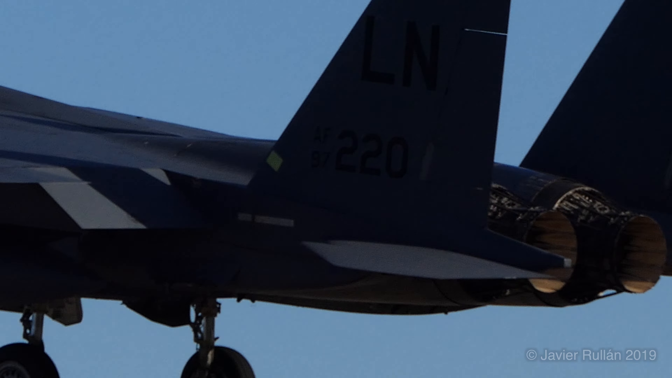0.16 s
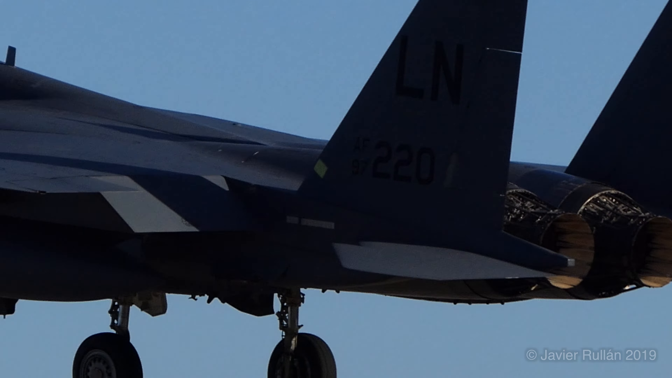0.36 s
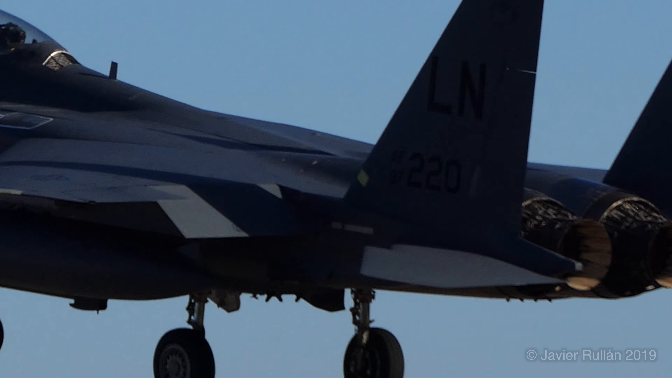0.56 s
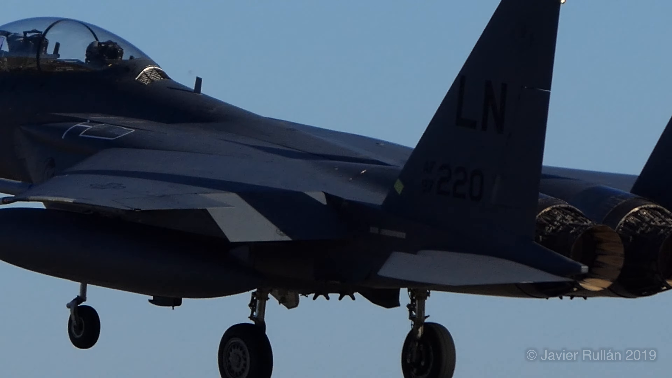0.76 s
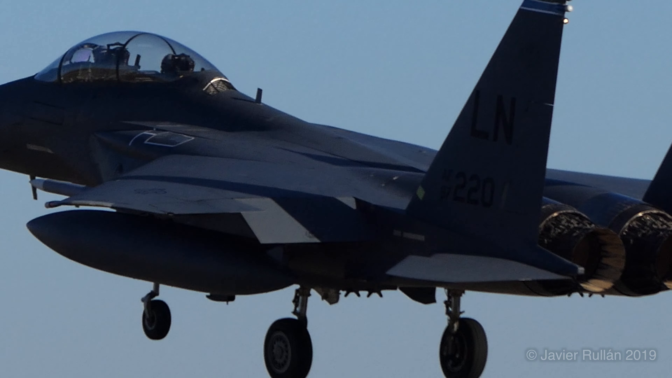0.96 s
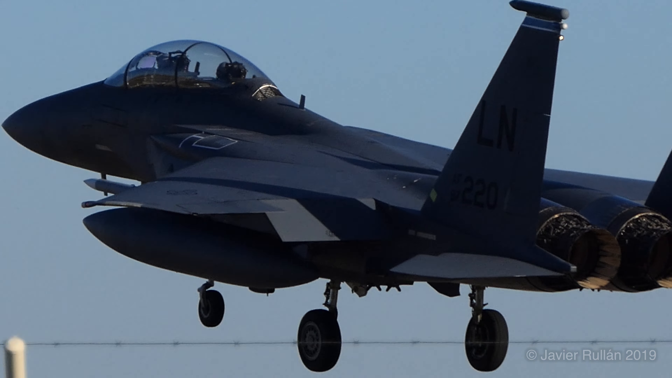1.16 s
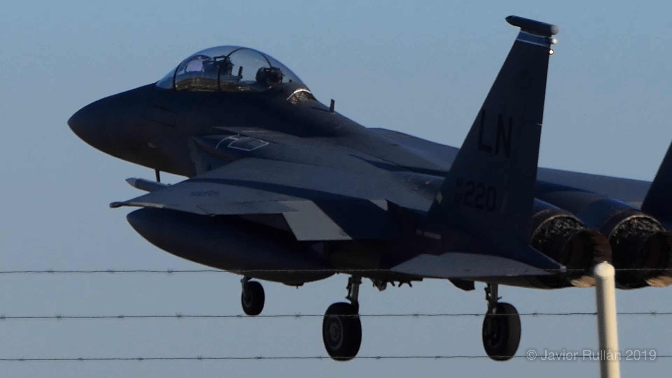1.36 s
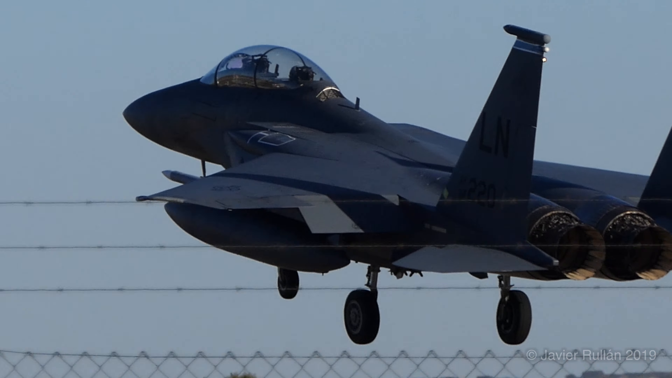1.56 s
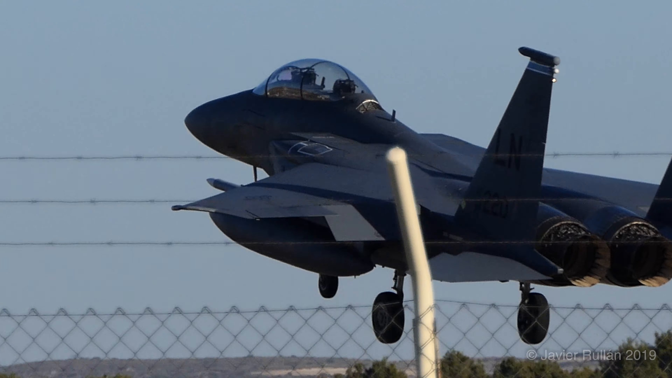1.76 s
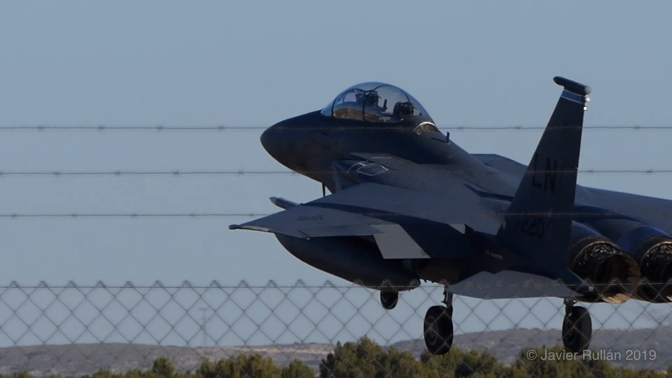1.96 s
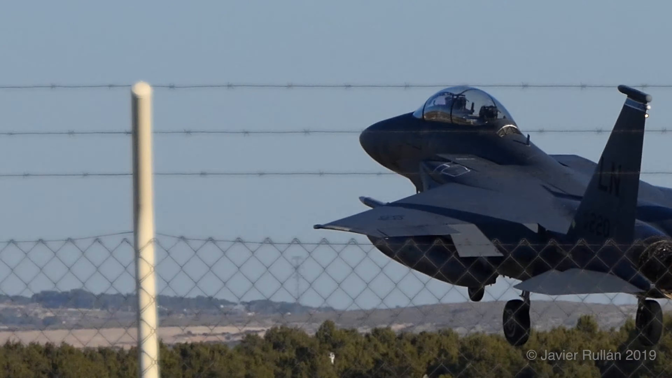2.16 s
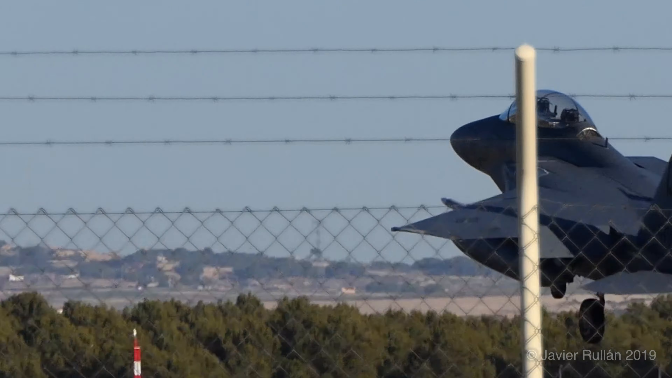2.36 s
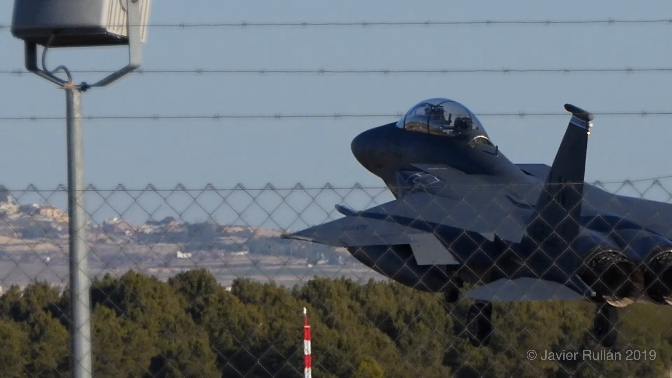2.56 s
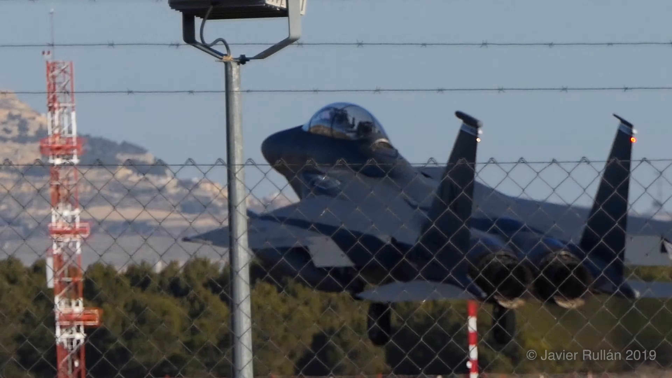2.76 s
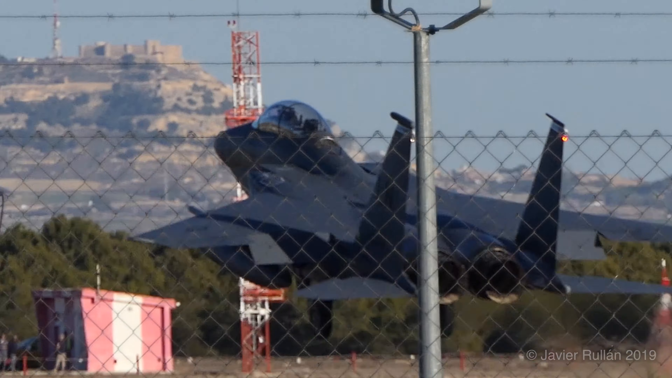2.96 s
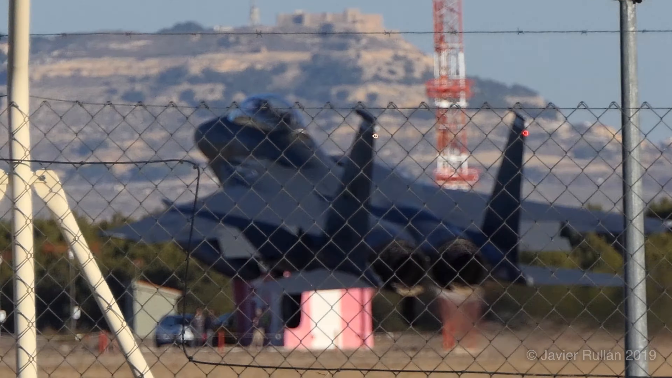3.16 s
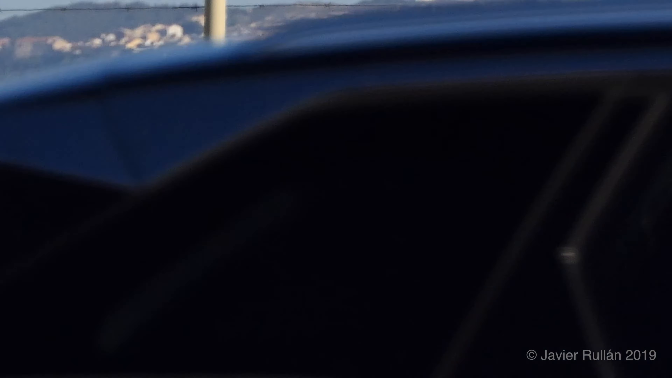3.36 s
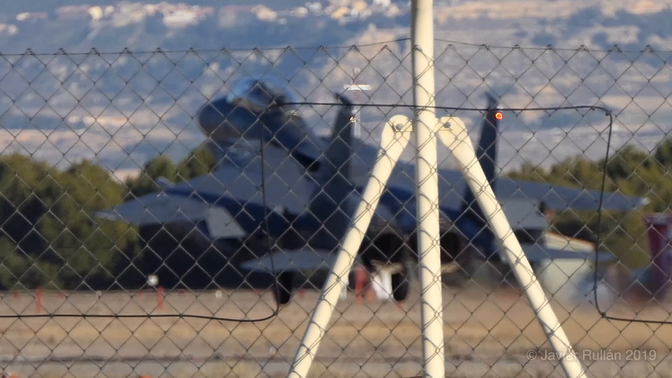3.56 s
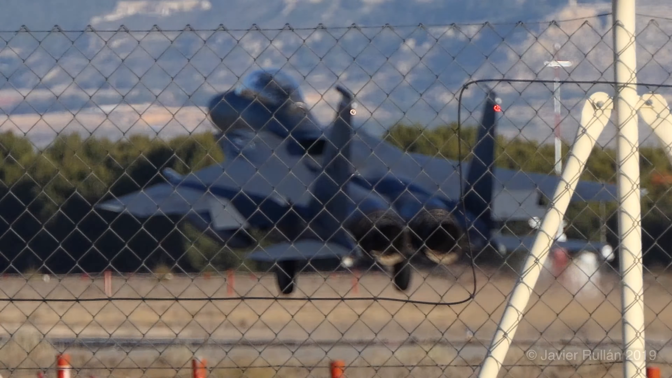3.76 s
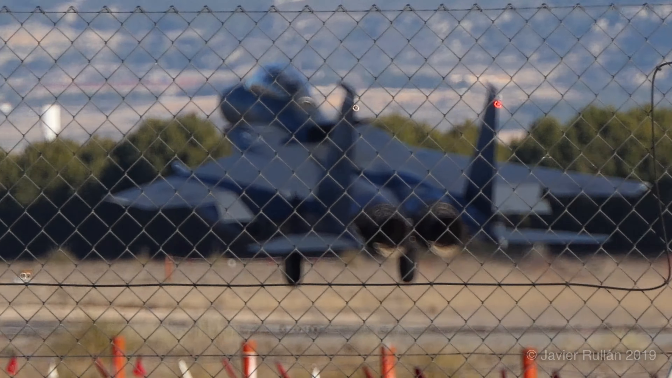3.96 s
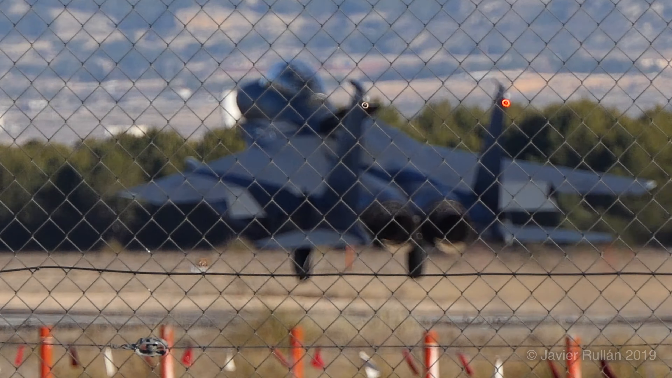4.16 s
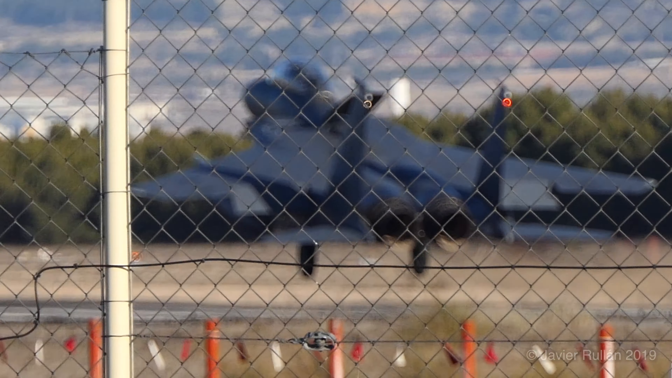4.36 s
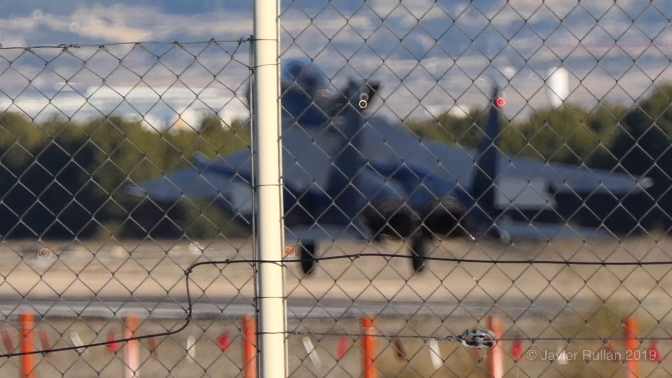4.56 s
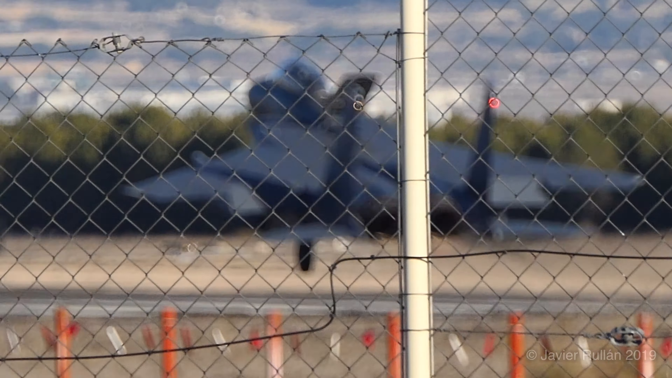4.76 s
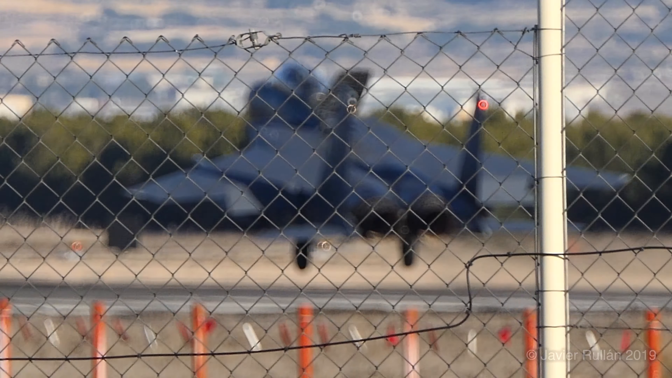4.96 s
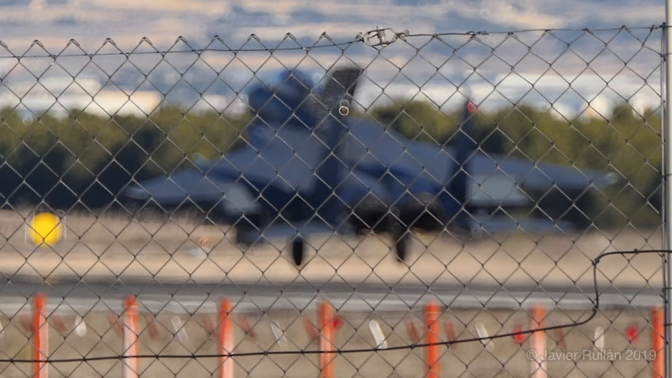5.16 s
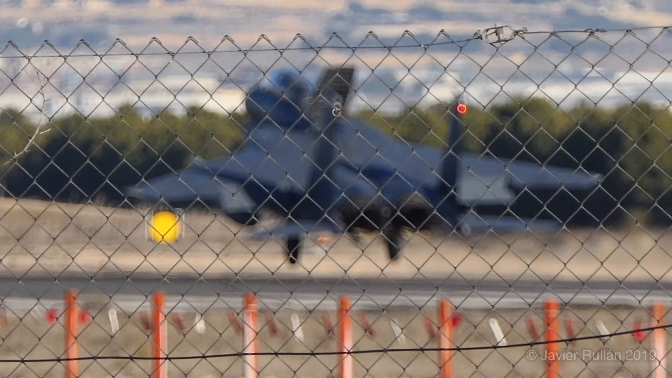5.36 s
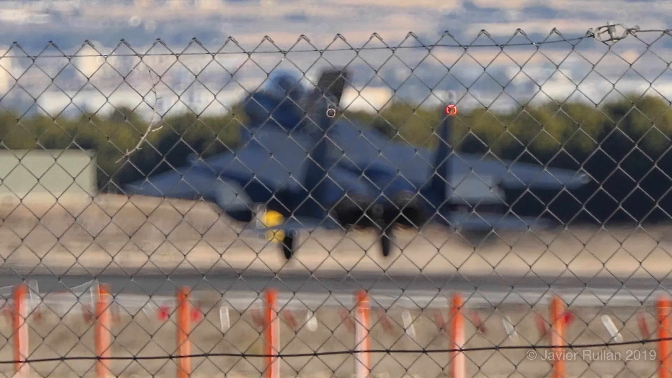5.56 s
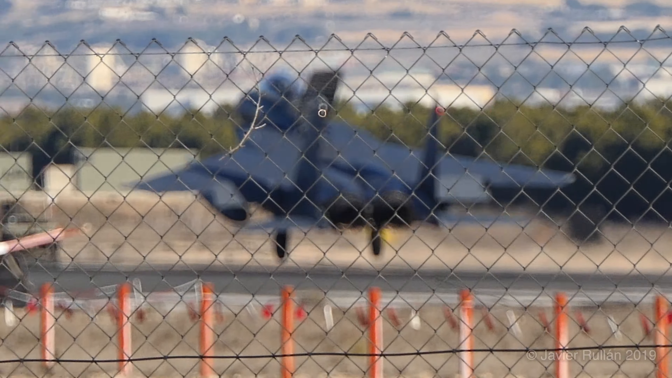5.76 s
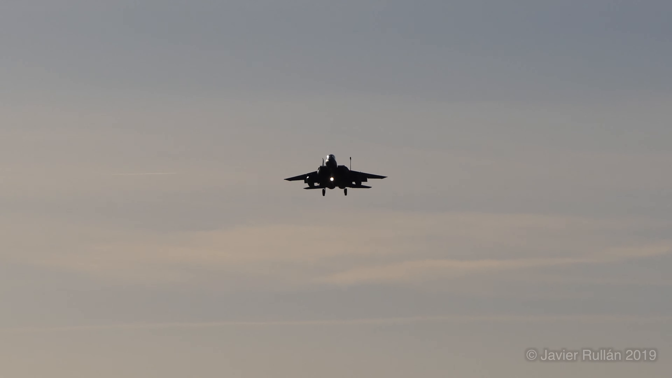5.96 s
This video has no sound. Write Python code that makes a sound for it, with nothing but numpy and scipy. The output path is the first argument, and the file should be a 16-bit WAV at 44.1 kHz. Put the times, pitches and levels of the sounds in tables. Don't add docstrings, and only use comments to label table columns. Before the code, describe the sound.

Loud turbulent jet exhaust fades into the distance, a road vehicle nears with tyre rush, climbing hum and metallic rattles, then an abrupt far, muffled roar.

```python
import sys
import numpy as np
from scipy import signal
from scipy.io import wavfile
from scipy.ndimage import uniform_filter1d

SR = 44100
rng = np.random.default_rng(int(sys.argv[2]) if len(sys.argv) > 2 else 0)


def store_wav(level_fs):
    pcm = np.round(np.clip(np.atleast_2d(level_fs), -1, 1) * 32767)
    wavfile.write(sys.argv[1], SR, pcm.T.astype(np.int16))


def ratio(d):
    e = np.asarray(d, float) / 20
    return 10 ** e


N = 265041
T = np.arange(N) / SR
HZ = np.fft.rfftfreq(1024, 1 / SR)
FRAME_S = np.arange(N // 256 + 5) * 256 / SR


def evened(x):
    return x / np.sqrt(np.mean(x ** 2) + 1e-20)


def read(points, hz):
    f, value = np.transpose(points)
    return np.interp(np.log(hz + 1), np.log(f + 1), value)


def curve(rows, t):
    s, value = np.transpose(rows)
    return np.interp(t, s, value)


def since(s, t):
    return np.maximum(t - s, 0)


def swells(rows, t):
    return sum(db * np.exp(-((t - s) / length_s) ** 2 / 2) for s, db, length_s in rows)


def drift(bins, frames):
    z = rng.standard_normal((len(FRAME_S), len(HZ))).T
    z = uniform_filter1d(z, size=bins, axis=0)
    return evened(uniform_filter1d(z, size=frames, axis=1))


def noise(field_db):
    a, b = rng.standard_normal((len(FRAME_S), len(HZ), 2)).T
    gains = np.array([ratio(0 * field_db), ratio(field_db)])
    flat, shaped = signal.istft((a + 1j * b) * gains, nperseg=1024, noverlap=768)[1]
    return shaped[:N] * np.sqrt(len(HZ)) / flat.std()


def steady(colour, patchy_db):
    return noise(read(colour, HZ)[:, None] + patchy_db * drift(bins=6, frames=5))


# f/Hz, level/dB per bin
FIELD_COLOUR = [(300, -107.5), (2000, -73.5), (4000, -84), (7000, -97), (9000, -101.5), (12500, -101.0),
                (15000, -103.5)]


def airfield():
    return steady(FIELD_COLOUR, 0.3)


# f/Hz, level/dB per bin
FAR_COLOUR = [(30, -80.5), (130, -66), (220, -65), (270, -57.5), (510, -47.5), (700, -56), (1000, -63),
              (1200, -70), (1450, -79), (2900, -100), (9000, -101), (15000, -103)]


def far_jet():
    return steady(FAR_COLOUR, 0.95)


# f/Hz, level/dB
RUSH_COLOUR = [(30, 3), (60, 3), (120, 8), (250, 11.5), (450, 8.5), (700, 2), (1100, -2), (1500, 1),
               (2200, 0.5), (2900, -5.5), (4000, -6), (5500, -13), (7500, -24.5), (12000, -38)]
# t/s, level/dB, length/s
RUSH_LULLS = [
    (1.85, -6, 0.11),
    (4.0, 1, 0.12),
    (4.7, -7, 0.11),
    (5.2, -1, 0.092),
]


def tyres():
    start_s, nearing_s, turn_in_s = 1.7, 2.84, 0.41
    far_db, turn_in_db, nearing_db_per_s = -77.5, 5.5, 1.81
    near_s = since(nearing_s, FRAME_S)
    level_db = far_db + turn_in_db * np.minimum(near_s / turn_in_s, 1)
    level_db = level_db + nearing_db_per_s * near_s + swells(RUSH_LULLS, FRAME_S)
    on = np.minimum(since(start_s, FRAME_S) / 0.11, 1)
    field_db = read(RUSH_COLOUR, HZ)[:, None] + level_db + 20 * np.log10(on + 1e-4)
    tremble_db = read([(500, 0.1), (2500, 2.0)], HZ)[:, None] * drift(bins=100, frames=5)
    return noise(field_db + tremble_db)


def hum(speed, orders, beats, wobble, shimmer_db):
    start_s = speed[0][0]
    hz = curve(speed, T)
    on = np.clip((T - start_s) / 0.15, 0, 1)
    levels_db = []
    for (db, db_per_s), rows in zip(orders, beats):
        levels_db.append(db + db_per_s * since(start_s, T) + swells(rows, T))
    slow = [evened(uniform_filter1d(rng.standard_normal(N), size=3000)) for _ in range(3)]
    turn = 2 * np.pi * np.cumsum(hz * (1 + wobble * slow[0])) / SR
    first = ratio(levels_db[0] + shimmer_db * slow[1])
    second = ratio(levels_db[1] + shimmer_db * slow[2])
    return np.sqrt(2) * on * (first * np.sin(turn) + second * np.sin(2 * turn + 1))


# t/s, f/Hz
GEAR = [(3.0, 210.0), (3.5, 216.4), (4.2, 223.7), (5.0, 231.4), (5.88, 244.2)]
# start level/dB, climb/(dB/s)
GEAR_ORDERS = [(-49, -3), (-64.5, 6.5)]
# t/s, level/dB, length/s
GEAR_FIRST_BEATS = [(3.36, -7, 0.057), (3.5, 3, 0.073), (4.15, 3.5, 0.17), (4.68, -6, 0.066),
                    (5.4, -3, 0.22)]
GEAR_SECOND_BEATS = [(3.5, -1, 0.22), (4.3, 7, 0.25), (4.63, -2, 0.071), (4.82, -10, 0.044),
                     (5.55, 5, 0.13), (5.8, -5, 0.077)]


def gear():
    return hum(GEAR, GEAR_ORDERS, [GEAR_FIRST_BEATS, GEAR_SECOND_BEATS], wobble=0.00058, shimmer_db=0.6)


# t/s, f/Hz
ENGINE = [(3.3, 73.1), (3.9, 78.1), (4.2, 80.4), (4.65, 84.54), (5.4, 89.2), (5.7, 93.6), (5.88, 95.4)]
# start level/dB, climb/(dB/s)
ENGINE_ORDERS = [(-62, 3), (-51.5, 4.45)]
# t/s, level/dB, length/s
ENGINE_FIRST_BEATS = [(3.65, 0, .15), (4.95, -3, 0.069), (5.62, 9.5, 0.16)]
ENGINE_SECOND_BEATS = [(3.45, -7.5, .2), (3.78, -10, .035), (4.68, -12.5, .055), (5.15, 1.5, .15),
                       (5.45, -19, 0.078), (5.9, -7, .08)]


def engine():
    beats = [ENGINE_FIRST_BEATS, ENGINE_SECOND_BEATS]
    return hum(ENGINE, ENGINE_ORDERS, beats, wobble=0.0024, shimmer_db=0.25)


# centre t/s, level/dB, ring f/Hz
RATTLES = [(3.199, -64, 3670), (3.32, -61, 3900), (3.362, -54, 3830), (3.452, -56, 3700), (3.49, -60, 3700),
           (3.684, -57, 4610), (3.832, -58, 3570), (3.96, -52, 3930), (4.084, -56, 3910),
           (4.125, -59, 3920), (4.217, -55, 3910), (4.252, -63, 3495), (4.462, -54.5, 3666),
           (4.49, -55, 4840), (4.553, -53.5, 3500), (4.814, -46.5, 3700), (4.853, -55, 4560),
           (4.911, -53, 3620), (4.974, -54, 3540), (5.05, -58.5, 4840), (5.176, -59.5, 3620),
           (5.287, -52, 3550), (5.323, -52, 3590), (5.402, -55, 4280), (5.529, -58.5, 3670),
           (5.676, -57.5, 3870), (5.758, -54, 4476), (5.822, -57, 3474), (5.865, -51.5, 3500)]


def rattles():
    width_hz, boost_db, length_s = 900, -1.5, 0.0089
    out = np.zeros(N + SR)
    t = np.arange(-2000, 2000) / SR
    shape = (len(RATTLES), len(t))
    chatter = rng.standard_normal(shape) * np.sqrt(rng.exponential(1, shape))
    r = np.exp(-np.pi * width_hz / SR)
    swell = np.exp(-(t / length_s) ** 2 / 2)
    for (s, db, hz), clicks in zip(RATTLES, chatter):
        turn = np.exp(2j * np.pi * hz * t)
        ring = (turn * signal.lfilter([1], [1, -2 * r, r * r], clicks / turn)).real
        start = round((s + t[0]) * SR)
        out[start:start + len(t)] += ratio(db + boost_db) * evened(ring) * swell
    return out[:N]


# t/s, level/dB per bin
JET = [(0.0, -24.5), (0.12, -28), (0.22, -26.5), (0.4, -29.5), (0.72, -29.5), (0.88, -33), (1.1, -34),
       (1.55, -37.5), (1.9, -43.5), (2.18, -43.5), (2.32, -47), (2.6, -49.5), (3.2, -50), (3.55, -48.5),
       (4.2, -51.5), (4.7, -53.5), (5.3, -58.5), (5.75, -54)]
# f/Hz, level/dB
JET_COLOUR = [(30, -51), (70, -20), (150, -5.5), (300, -7.5), (450, -1.5), (750, -3.5), (1100, -8),
              (3500, -26.5), (5000, -38.5), (6900, -47), (8400, -60), (10200, -58), (13200, -68),
              (14400, -88)]
# f/Hz, level/dB
GRAZING_COLOUR = [(30, -31.5), (70, -18), (150, -2), (230, -7), (330, -8), (480, -8.5), (650, 0.0),
                  (900, -4.5), (1200, -9.5), (1500, -19.5), (2500, -23), (4000, -47.5), (7000, -74),
                  (14000, -108.5)]
# t/s, share/1
GRAZING = [(0, 0), (1.3, .15), (2.5, 1)]
# t/s, level/dB
AFT = [(0, -15.5), (.35, -11.5), (.55, 0.5), (.85, 0), (1.1, 7.5), (1.6, 5.5), (1.85, 2), (2.1, 4),
       (2.4, 0.5)]
# t/s, level/dB, length/s
GUSTS = [(0.0, -3, 0.052), (.17, 0.5, 0.024), (.41, 3.5, .03), (.53, 1, 0.024), (.7, 5, .07),
         (.88, -0.5, 0.038), (1.0, 0.5, 0.035), (1.13, 2, .03), (1.25, -3, 0.14), (1.56, 2.5, 0.081),
         (1.82, -5, 0.058), (2.05, 4, 0.06)]
# t/s, level/dB, length/s
RUMBLE_SWELLS = [
    (0.0, -5, 0.033),
    (.93, 4.5, 0.057),
    (1.11, 3.5, 0.034),
    (1.3, 5, 0.023),
    (2.0, 1, 0.047),
    (3.75, -5, 0.24),
    (5.55, -6, .1),
]
# t/s, f/Hz, lift level/dB, length/s
ECHO_PEAKS = [(.15, 960, 2, 0.076), (.38, 440, 8, 0.093), (.6, 675, 3, 0.17), (1.0, 406, 6, 0.068),
              (1.327, 452, 6, 0.067), (1.597, 1090, 4, 0.079), (2.173, 805, 6, 0.076),
              (2.397, 1260, 4, 0.047), (2.75, 583, 2, 0.36), (3.65, 794, 3.5, 0.25)]


def jet():
    far, gust_db = curve(GRAZING, FRAME_S), swells(GUSTS, FRAME_S)

    rumble_db = -0.9 - 0.5 * gust_db + 4 * since(4.75, FRAME_S) + swells(RUMBLE_SWELLS, FRAME_S)

    bright_far_db, dull_from_s, dull_db_per_s = 2, 2.9, 8.5
    bright_db = gust_db + bright_far_db * far - dull_db_per_s * since(dull_from_s, FRAME_S)

    fizz_near_db, fizz_loss_db, fizz_goes_s, fizz_fall_s = 4, 4.5, 0.71, 0.59
    fizz_gone = np.minimum(since(fizz_goes_s, FRAME_S) / fizz_fall_s, 1)
    fizz_db = 1.12 * gust_db + fizz_near_db - fizz_loss_db * fizz_gone

    field_db = np.outer(read(JET_COLOUR, HZ), 1 - far) + np.outer(read(GRAZING_COLOUR, HZ), far)
    field_db += curve(JET, FRAME_S)
    field_db += np.outer(read([(250, 1), (500, 0)], HZ), rumble_db)
    field_db += np.outer(read([(1000, 0), (1700, 1), (3000, 1), (6000, 0)], HZ), bright_db)
    field_db += np.outer(read([(3000, 0), (6000, 1)], HZ), fizz_db)
    field_db += np.outer(read([(90, 0.98), (190, 0.017)], HZ), curve(AFT, FRAME_S))
    for s, peak_hz, lift_db, length_s in ECHO_PEAKS:
        band = np.exp(-(np.log((HZ + 1) / peak_hz) / 0.11) ** 2 / 2)
        field_db += np.outer(band, swells([(s, lift_db, length_s)], FRAME_S))

    flutter_db = read([(300, 0.061), (1500, 0.59), (5000, 0.74), (9000, 2.4)], HZ)[:, None]
    flutter_db = flutter_db * drift(bins=200, frames=8)
    return noise(field_db + 1.27 * drift(bins=8, frames=14) + flutter_db)


def scene():
    vehicle = tyres() + gear() + engine() + rattles()
    runway = airfield() + vehicle + jet()
    change_s, fade_s = 5.885, 0.0015
    after = np.clip((T - change_s) / fade_s, 0, 1)
    return ((1 - after) * runway + after * far_jet())[None]


def low_pass(x):
    return signal.sosfilt(signal.butter(12, 15630, fs=SR, output="sos"), x)


def record(dry):
    thin = signal.sosfilt(signal.butter(2, 38, "high", fs=SR, output="sos"), dry)
    edges = np.clip(np.minimum(T, T[-1] - T) / 0.002, 0, 1)
    return low_pass(thin * edges)


dry = scene()
out = record(dry)
store_wav(out)
```